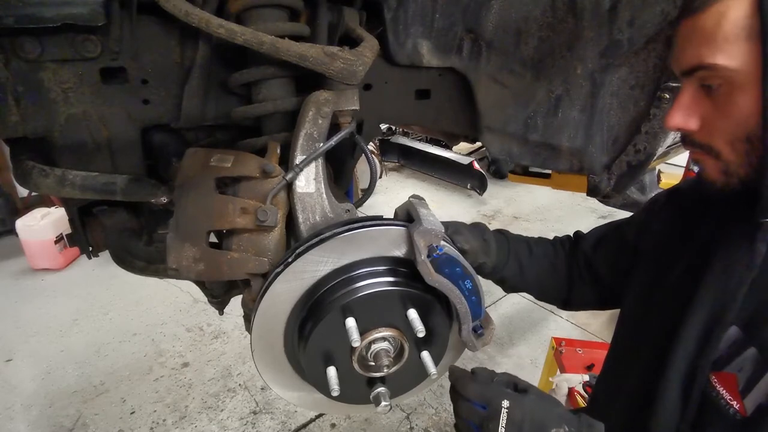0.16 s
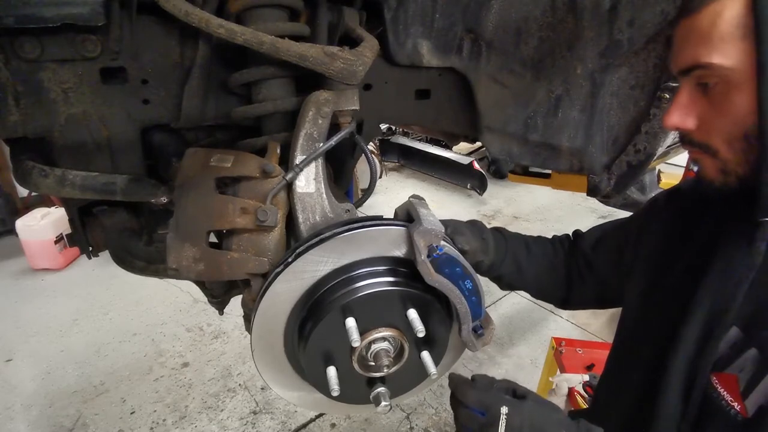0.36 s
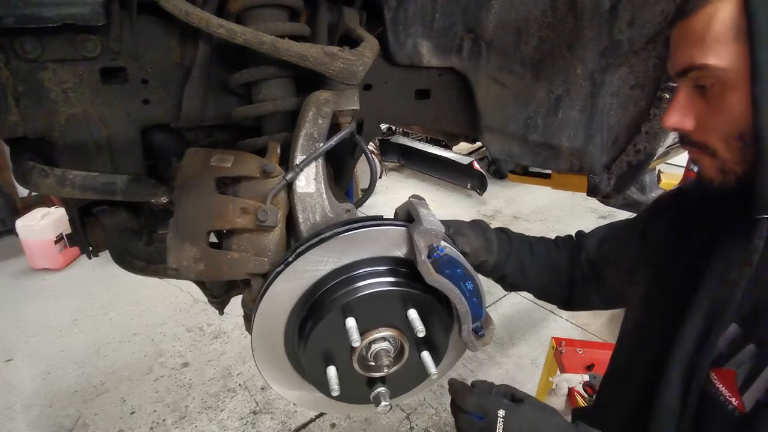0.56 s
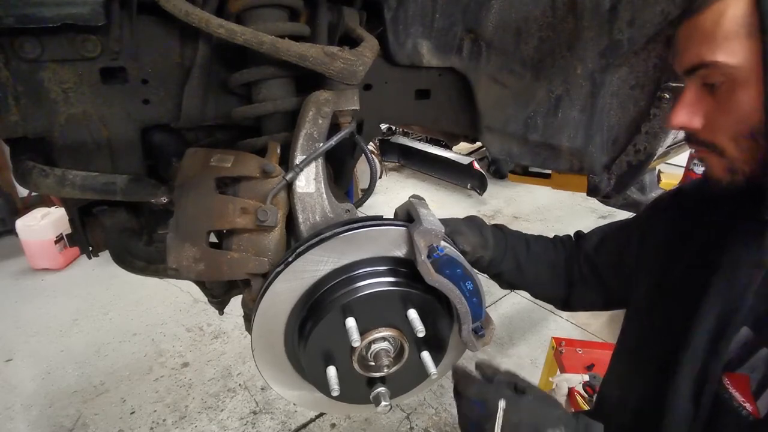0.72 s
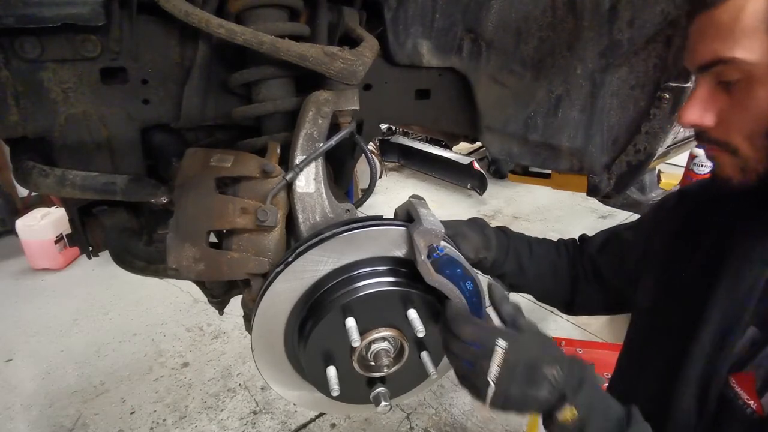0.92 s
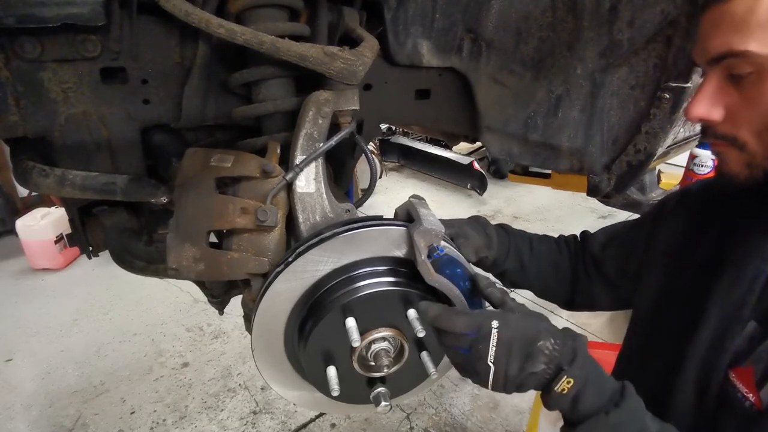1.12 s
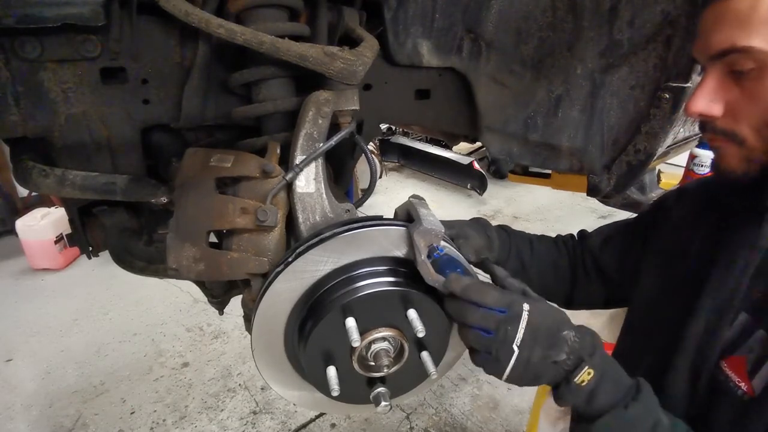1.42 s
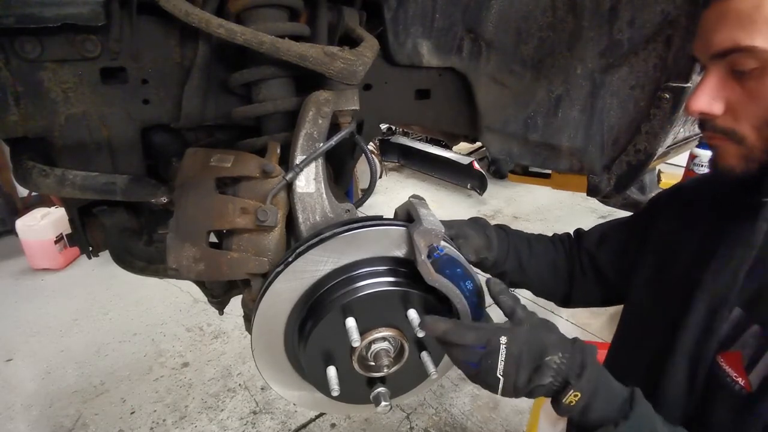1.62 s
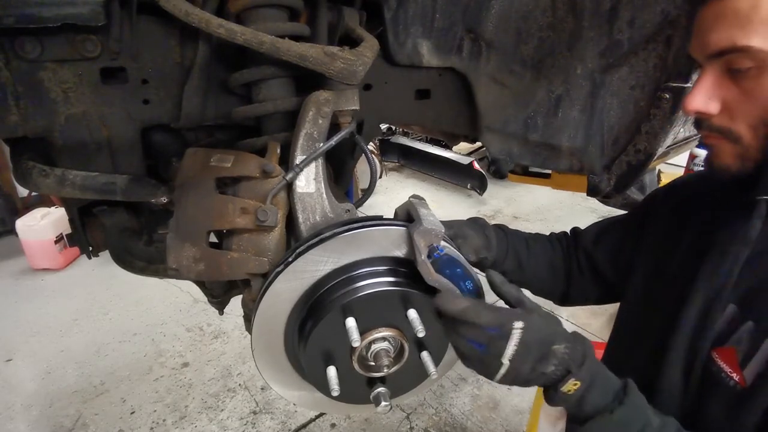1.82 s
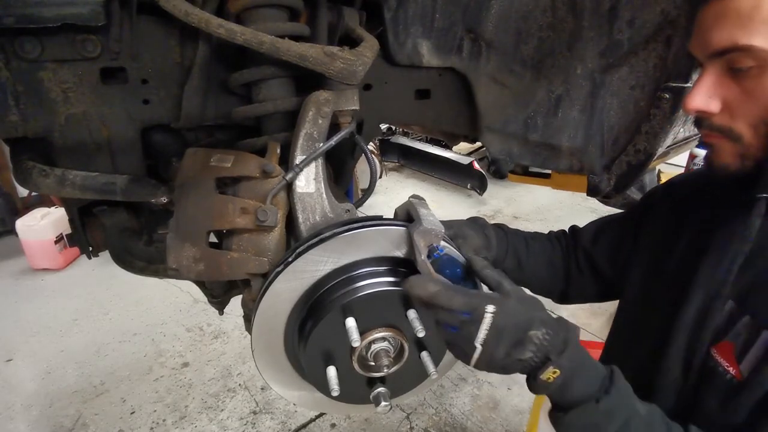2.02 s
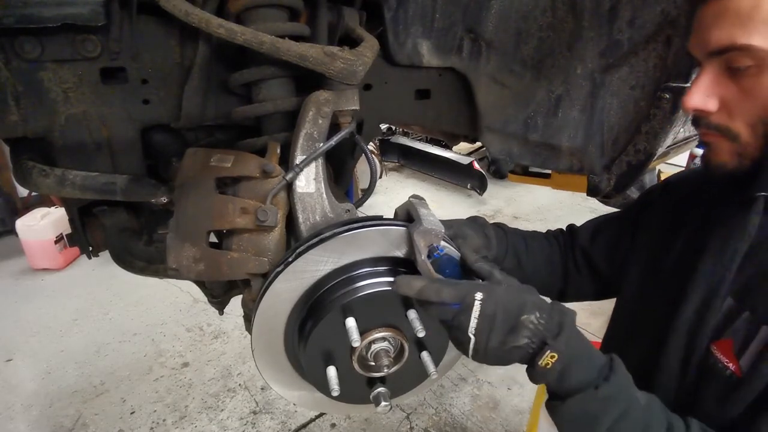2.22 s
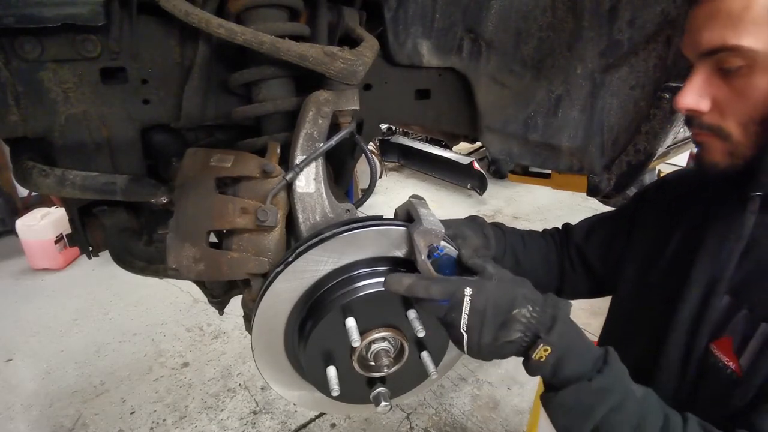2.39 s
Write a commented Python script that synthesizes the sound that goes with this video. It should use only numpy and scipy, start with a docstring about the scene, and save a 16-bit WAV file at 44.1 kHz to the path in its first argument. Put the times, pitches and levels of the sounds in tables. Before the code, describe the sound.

A metal brake pad is fitted into its bracket, heard close in a lightly reverberant garage. Faint scrapes and ticks at 0.1 and 0.3 seconds lead to a brighter ringing tap at 0.42 with a soft low boom. From 0.9 to 2.0 come quiet rubs, clearest near 1.2 and 1.85. Small ticks from 2.25 precede a very loud, hard clack at 2.49. Faint hum and hiss throughout.

```python
"""A steel brake pad is worked into its caliper bracket by gloved hands in a garage.
First its ears scrape along the spring clips while it taps, rings and knocks the suspension into a low boom.
Then gloves and pad rub over the metal, and at last the pad snaps home with a loud clack.
Struck parts are sums of decaying modes with noise cracks; scrapes and rubs are grainy coloured noise.
A low hum and a faint hiss, both steady coloured noise, lie underneath throughout."""
import sys
import numpy as np
from scipy import signal
from scipy.fft import rfft, irfft
from scipy.io import wavfile

SR = 44100
rng = np.random.default_rng(int(sys.argv[2]) if len(sys.argv) > 2 else 0)


def transcribe(signal):
    """Save signal, clipped to [-1, 1], as a 16-bit WAV file at the path in sys.argv[1]."""
    frames = np.atleast_2d(signal).T
    limited = np.clip(frames, -1, 1)
    pcm = np.round(limited * 32767).astype(np.int16)
    wavfile.write(sys.argv[1], SR, pcm)


N = 112454
T = np.arange(N) / SR   # time in s

# contacts of the pad: start_s, pad_ring_db, edge_share (0 face to 1 edge), bracket_ring_db, crack_db,
# free_share (part that rings on, 0 to 1), ring_length_s
CONTACTS = [(.0955, -61, 0.94, -73, -58, 0.57, .1), (0.312, -55, 0.89, -85, -76, 0.9, 0.04),
            (.4235, -43.5, 1.0, -59, -67, 0.72, 0.024), (.468, -54, 0.89, -60, -57, 0.93, .115),
            (1.185, -80, 0.4, -69, -49.5, 0.4, .1), (1.526, -82, .5, -73, -60, 0.4, .1),
            (1.848, -82, .3, -67, -61, 0.1, .15), (2.247, -55, 0.36, -88, -55, 1, 0.106),
            (2.4785, -61, .1, -57, -37.5, 0.1, .1), (2.485, -20.5, 0.08, -24.5, -22.5, 0.11, .2),
            (2.4955, -27.5, 0.2, -36, -33, 0, .2), (2.512, -59, 0.6, -46, -55, 0.2, .2),
            (2.533, -32, 0.1, -53, -55, 0.3, .2)]
# modes of the pad: pitch_hz, face_level_db, edge_level_db, t60_s
PAD_MODES = [(949.5, -24.5, 0.5, 0.74), (1276, -41, -12.5, 0.47), (2233, 1, -11, 1), (3697, -7, -12, 0.23),
             (4390, -15, -25, 0.16), (5055, -32, -11, 0.24), (5326, -27, -2, 0.24)]
# modes of the bracket: pitch_hz, level_db, t60_s
BRACKET_MODES = [(540, -26, 0.25), (873.7, -3.5, 0.16), (963, -6.5, 0.24), (1121, -11, .15),
                 (1377, -11, .35), (1730, -13, 0.35), (2161, -2.5, 0.75), (2326, -4.5, 0.27),
                 (2394, -1.5, 0.35), (2540, -19, 0.19), (2610, -9, 0.12), (3290, -16, 0.14),
                 (3365, -11.5, 0.14), (4137, -9, 0.18), (4670, -11, 0.12), (5320, -10.5, 0.9),
                 (6480, -27, .15)]
# spectrum of the crack of a contact: frequency_hz, level_db
CRACK_SPECTRUM = [(120, -28), (250, -19), (500, -9.5), (950, -2.5), (1600, -11), (2350, 1.5), (2900, -6),
                  (3300, -2), (3900, -8.5), (4400, -2), (4900, -10), (5600, -18.5), (7200, -18.5),
                  (8300, -39), (15000, -50)]
# knocks passed to the suspension: start_s, thud_db, boom_db, boom_rise_s
KNOCKS = [(0.093, -53.5, -59, 0.035), (.31, -75, -60.5, 0.022), (0.4228, -37, -38.5, 0.018),
          (2.374, -67, -52, 0.0036), (2.488, -52.5, -54.5, 0.023)]
# low modes of suspension and wheel arch: pitch_hz, level_db
SUSPENSION_MODES = [(75, -3), (112, 3), (136, -4.5), (148, -1), (167, -3.5), (238, -5.5), (265, -9),
                    (302, -9.5), (476, -17.5), (560, -30), (760, -21)]
# spectrum of the thud: frequency_hz, level_db
THUD_SPECTRUM = [(40, -37), (120, -4), (270, 3.5), (400, -8), (560, 0.5), (680, -13), (780, -7.5),
                 (1100, -12.5), (1600, -45), (4000, -57)]
# spectrum of the noise in the boom: frequency_hz, level_db
RUMBLE_SPECTRUM = [(25, -41), (52, -19), (78, 3), (115, -5), (180, -4), (290, -10), (380, -15),
                   (750, -27.5), (1400, -35), (4000, -61)]
# slides of the pad's ears in the clips: peak_s, rise_s, fall_s, level_db
SLIDES = [(0.061, 0.017, 0.014, -50), (.082, 0.0088, 0.014, -52.5), (.306, .022, 0.021, -52),
          (0.344, .001, 0.0056, -54), (0.4195, .013, 0.01, -45), (.482, 0.0092, 0.014, -55),
          (2.249, .001, 0.0089, -53), (2.362, 0.0032, 0.0086, -55.5), (2.4268, 0.0038, 0.0034, -48),
          (2.481, 0.0046, .006, -51)]
# spectrum of a slide: frequency_hz, level_db
SLIDE_SPECTRUM = [(300, -15), (1200, -9.5), (1600, -14.5), (2300, -5), (3200, -16.5), (4200, -5), (5050, 2),
                  (5900, -14), (7100, -9.5), (9000, -22.5), (14500, -18.5)]
# rubs of gloves and pad over the metal: peak_s, rise_s, fall_s, rasp_db, hiss_db
RUBS = [(.88, 0.049, 0.12, -74, -65), (1.172, 0.0089, 0.013, -60.5, -58),
        (1.223, 0.019, 0.014, -57.5, -55.5), (1.315, 0.025, 0.021, -81, -60),
        (1.53, .03, 0.048, -74, -65.5), (1.695, 0.048, 0.011, -76, -62), (1.85, 0.01, 0.0072, -48.5, -45.5),
        (1.875, .01, 0.074, -70, -78), (2.01, 0.058, 0.084, -73.5, -63.5),
        (2.413, 0.011, 0.043, -84, -56.5), (2.467, 0.0052, 0.014, -44.5, -40)]
# spectrum of the lower rasp of a rub: frequency_hz, level_db
RASP_SPECTRUM = [(200, 3), (800, -17), (1400, 8), (1900, 6.5), (2800, 1), (3600, -6), (6000, -58)]
# spectrum of the higher hiss of a rub: frequency_hz, level_db
RUB_HISS_SPECTRUM = [(1500, -10), (3400, -9), (4600, -1), (6300, 1.5), (7400, -3), (9000, -22),
                     (14500, -16.5)]
# spectrum of the background hum: frequency_hz, level_db
HUM_SPECTRUM = [(15, 6.5), (28, -1), (45, -16.5), (65, 2.5), (88, 5.5), (110, -1), (145, -14), (280, -19.5),
                (500, -22), (1500, -61)]
# spectrum of the background hiss: frequency_hz, level_db
HISS_SPECTRUM = [(300, -7.5), (650, -5), (1000, -2), (1800, -2.5), (2700, -1), (3500, -5.5), (4300, 2),
                 (4900, -2), (5500, -5), (6700, -6.5), (7500, -0.5), (8200, -12), (10100, -10.5),
                 (10600, -2), (11500, -5), (12300, -12), (13200, -2.5), (13950, -13), (14500, -5.5),
                 (15500, -5.5)]
# narrow peaks in the hiss: pitch_hz, level_db
WHINES = [(4800, -74.5), (7640, -84.5), (8545, -77), (14735, -83)]
# colour of the wall reflections: frequency_hz, level_db
WALL_SPECTRUM = [(100, -1.5), (3000, 2), (6000, -3.5), (15000, -3)]

TOUCH_S = 0.00034                 # time constant of the onset of a touch
CLAMP_S, GRIP_S = 0.014, 0.0099   # loss of the first swing, later damping by the fingers
CRACK_S, CRACK_TAIL_S, CRACK_TAIL_DB = 0.0076, 0.16, -26
THUD_S, BOOM_HOLD_S, BOOM_FALL_S = 0.035, 0.12, 0.075
SWAY_DB, RUMBLE_DB = -4, -6       # tonal and noisy parts of the boom
GRAINS_PER_S, GRAIN_SHARE = 4000, 0.68   # mean rate of slips, their share of the friction power
HUM_DB, HISS_DB, WHINE_WIDTH_HZ = -61, -62, 70
GARAGE_T60_S, GARAGE_DELAY_S, GARAGE_DB = 0.3, 0.011, -11.01
CUTOFF_HZ = 15650


def contacts():
    """Impact excitation: a contact cracks and rings pad and bracket, whose swing is partly lost, then gripped."""
    out = np.zeros(N)
    crack = coloured(CRACK_SPECTRUM)
    for start, pad_db, edge, bracket_db, crack_db, free, length in CONTACTS:
        # the point of impact sets how strongly each pad mode is driven
        pad_modes = [(hz, face_db * (1 - edge) + edge_db * edge, t60)
                     for hz, face_db, edge_db, t60 in PAD_MODES]
        ringing = from_db(pad_db) * ring(start, pad_modes) + from_db(bracket_db) * ring(start, BRACKET_MODES)
        first_loss = free + (1 - free) * decay(start, CLAMP_S)
        grip = np.exp(-np.maximum(T - start - length, 0) / GRIP_S)
        out += ringing * first_loss * grip
        crack_shape = decay(start, CRACK_S) + from_db(CRACK_TAIL_DB) * decay(start, CRACK_TAIL_S)
        out += from_db(crack_db) * crack * crack_shape
    return out


def ring(start, modes):
    """Modal superposition: struck modes decay exponentially, and a fresh blow adds to the swing left."""
    t = T[T >= start]
    out = np.zeros(N)
    for k, (hz, db, t60) in enumerate(modes):
        sign = (-1) ** k
        fall = np.exp(-np.log(1000) * (t - start) / t60)
        # phase runs from time zero, so repeated blows drive a mode in step
        out[N - len(t):] += sign * from_db(db) * fall * np.sin(2 * np.pi * hz * t)
    return out * (1 - np.exp(-np.maximum(T - start, 0) / TOUCH_S))


def knocks():
    """Structure-borne sound: a dull thud, then low modes of suspension and wheel arch build, hold and die."""
    sway = sum(from_db(db) * np.sin(2 * np.pi * (hz * T + rng.random())) for hz, db in SUSPENSION_MODES)
    thud = coloured(THUD_SPECTRUM)
    boom = from_db(RUMBLE_DB) * coloured(RUMBLE_SPECTRUM) + from_db(SWAY_DB) * rms_one(sway)
    out = np.zeros(N)
    for start, thud_db, boom_db, rise in KNOCKS:
        t = np.maximum(T - start, 0)
        boom_shape = (1 - np.exp(-t / rise)) * np.exp(-np.maximum(t - BOOM_HOLD_S, 0) / BOOM_FALL_S)
        out += from_db(thud_db) * thud * decay(start, THUD_S)
        out += from_db(boom_db) * boom * boom_shape
    return out


def slides():
    """Sliding friction: short bright scrapes of the pad's ears along the spring clips."""
    strength = sum(from_db(db) * swell(peak, rise, fall) for peak, rise, fall, db in SLIDES)
    return friction(SLIDE_SPECTRUM) * strength


def rubs():
    """Sliding friction in two bands: each rub has a lower rasp and a higher hiss."""
    rasp, hiss = friction(RASP_SPECTRUM), friction(RUB_HISS_SPECTRUM)
    out = np.zeros(N)
    for peak, rise, fall, rasp_db, hiss_db in RUBS:
        out += swell(peak, rise, fall) * (from_db(rasp_db) * rasp + from_db(hiss_db) * hiss)
    return out


def friction(spectrum):
    """Stick and slip: dense tiny random slips over smooth rubbing noise, coloured together."""
    slips = rms_one((rng.random(N) < GRAINS_PER_S / SR) * rng.standard_normal(N))
    smooth = rng.standard_normal(N)
    return coloured(spectrum, np.sqrt(GRAIN_SHARE) * slips + np.sqrt(1 - GRAIN_SHARE) * smooth)


def garage(x):
    """Diffuse reverberation: convolution with an exponentially decaying noise tail from the walls."""
    tail = coloured(WALL_SPECTRUM) * decay(GARAGE_DELAY_S, GARAGE_T60_S / np.log(1000))
    tail /= np.sqrt(np.sum(tail ** 2))   # unit energy
    return from_db(GARAGE_DB) * signal.fftconvolve(x, tail)[:N]


def background():
    """Stationary noise: a low workshop hum and an even hiss with a few narrow resonant peaks."""
    out = from_db(HUM_DB) * coloured(HUM_SPECTRUM) + from_db(HISS_DB) * coloured(HISS_SPECTRUM)
    radius = np.exp(-np.pi * WHINE_WIDTH_HZ / SR)   # pole radius of a two-pole resonator
    for hz, db in WHINES:
        poles = [1, -2 * radius * np.cos(2 * np.pi * hz / SR), radius ** 2]
        whine = signal.lfilter([1, 0, -1], poles, rng.standard_normal(N))
        out += from_db(db) * rms_one(whine)
    return out


def decay(start, fall):
    """Free decay: a quick start and an exponential fall."""
    t = np.maximum(T - start, 0)
    return (1 - np.exp(-t / TOUCH_S)) * np.exp(-t / fall)


def swell(peak, rise, fall):
    """Two-sided exponential envelope: a rise to a peak and a fall from it."""
    return np.exp(-np.maximum((peak - T) / rise, (T - peak) / fall))


def coloured(spectrum, source=None):
    """Linear filtering: steady white noise, or a given source, takes on this spectrum at unit rms."""
    if source is None:
        source = rng.standard_normal(N)
    hz, db = np.transpose(spectrum)
    f = np.maximum(np.arange(N // 2 + 1) * SR / N, 1)
    gain = from_db(np.interp(np.log(f), np.log(hz), db))
    # roll off an octave beyond either end of the spectrum
    gain /= np.sqrt((1 + (hz[0] / 2 / f) ** 4) * (1 + (f / 2 / hz[-1]) ** 4))
    return rms_one(irfft(rfft(source) * gain, N))


def rms_one(x):
    """Power normalisation: scale to unit rms."""
    return x / np.sqrt(np.mean(x ** 2) + 1e-20)


def from_db(db):
    """Logarithmic level: decibels to amplitude gain."""
    return 10 ** (np.asarray(db) / 20)


def scene():
    """Superposition: metal sounds with their reverberation, dry knocks and the background."""
    metal = contacts() + slides() + rubs()
    return (metal + garage(metal) + knocks() + background())[None]


def record(dry):
    """Band limitation: a steep elliptic low-pass cuts the top."""
    lowpass = signal.ellip(12, 0.1, 80, CUTOFF_HZ, fs=SR, output="sos")
    return signal.sosfilt(lowpass, dry)


dry = scene()
out = record(dry)
transcribe(out)
```